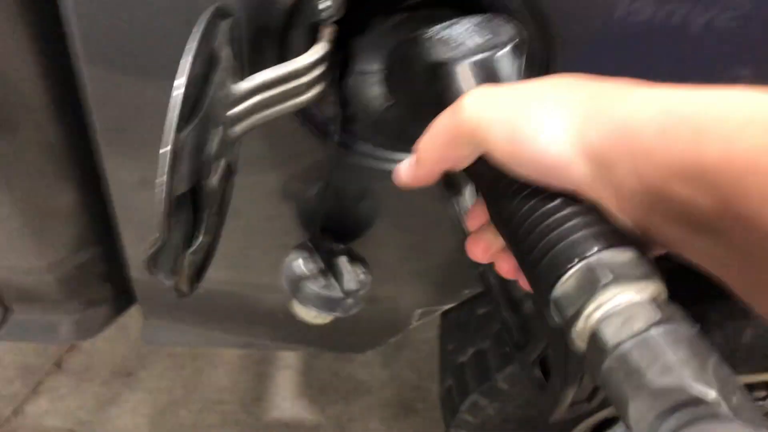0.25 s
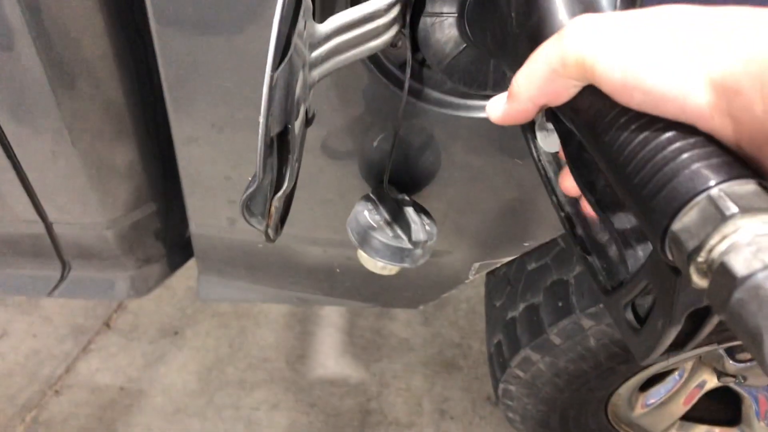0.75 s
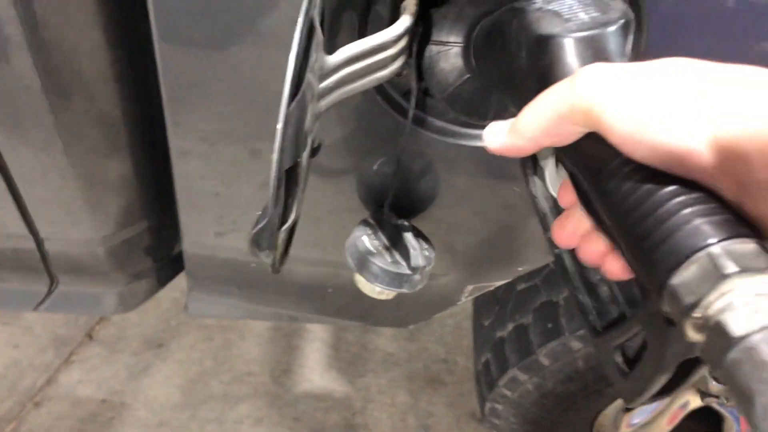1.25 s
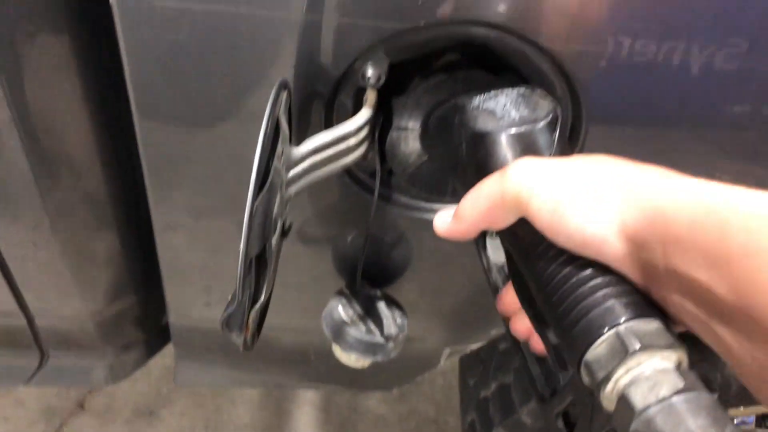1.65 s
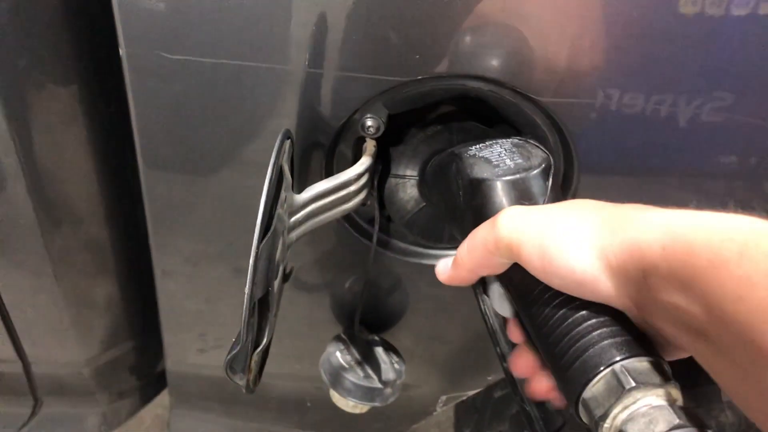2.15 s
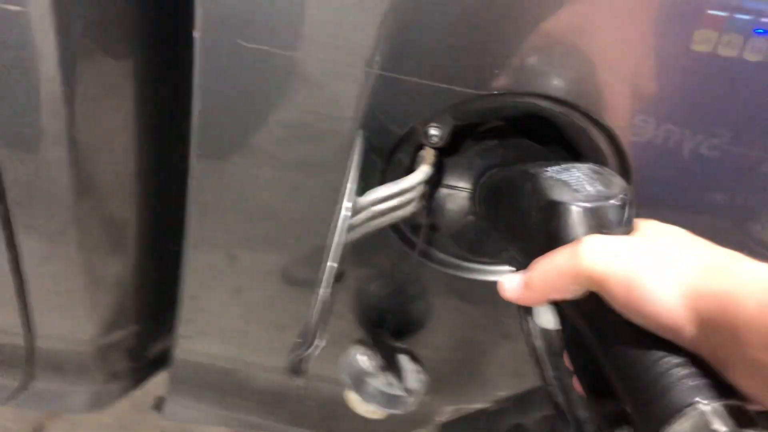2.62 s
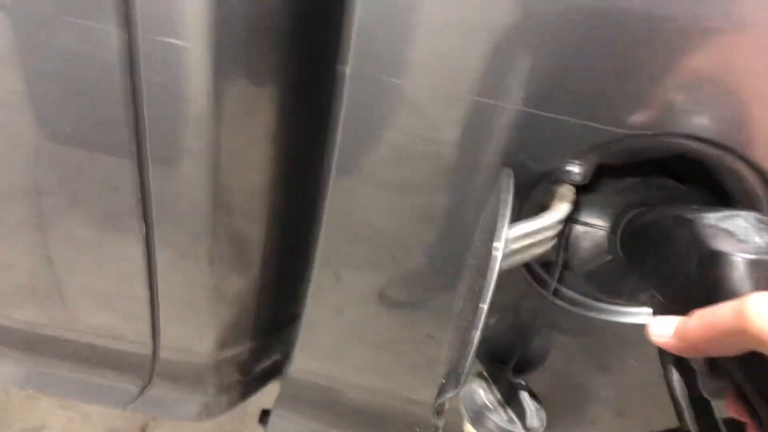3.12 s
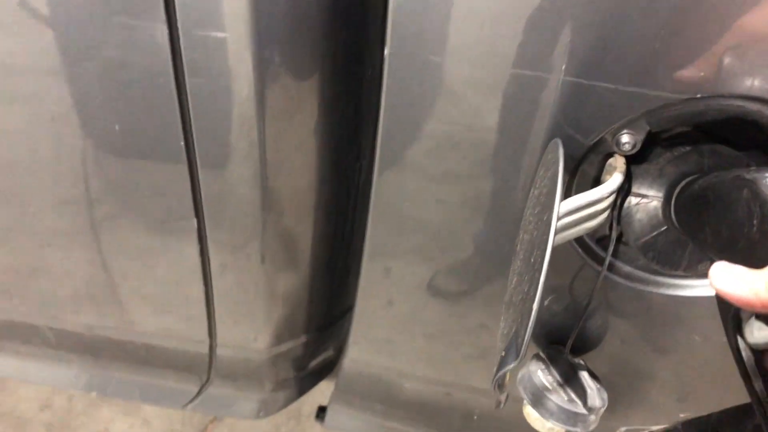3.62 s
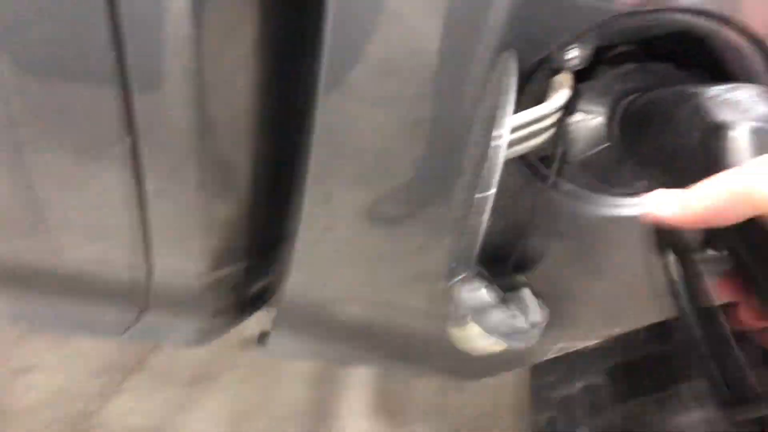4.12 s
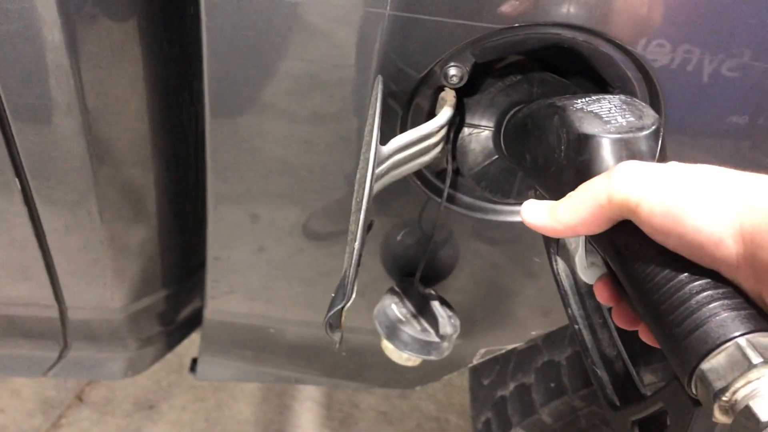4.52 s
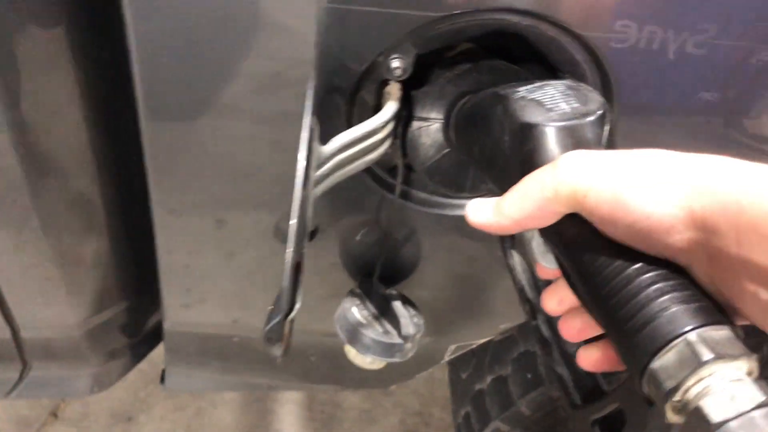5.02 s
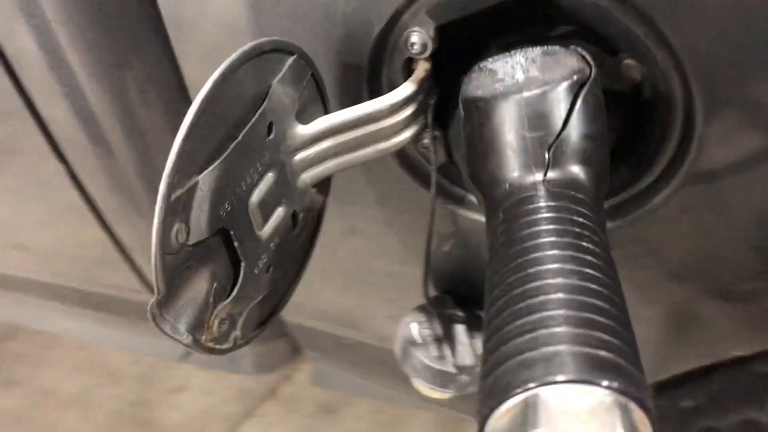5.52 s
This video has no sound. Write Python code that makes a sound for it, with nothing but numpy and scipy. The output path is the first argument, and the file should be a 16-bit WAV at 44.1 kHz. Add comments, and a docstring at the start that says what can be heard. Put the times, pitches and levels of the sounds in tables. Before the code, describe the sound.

From the very start to about 3.95 seconds, a fuel nozzle lever is worked rapidly in a car's filler neck. Each pull is a loud, bright metallic snap, followed almost at once by a knock and small rebound, with loose rattling; thinner clicks mark many releases. Pulls come roughly every 0.22 seconds, quicken to about 0.15 around 2.3 to 3 seconds and grow stronger, then slow again. Low hollow thumps from pipe and panel accompany them, with short scattered echoes from car, pump and canopy. A brief, faint valve groan occurs near 3.3 to 3.45. After the last click, only low, dull forecourt noise remains, with slight finger rustles around 4.1 to 4.5, a clear light metal tap at 4.57 and tiny ticks. From 5.15, low handling thuds bump the close microphone; the rubber grip creaks from 5.3 to 5.63 and releases with a gritty scuff near 5.66, ending at 5.75.

```python
"""Over low forecourt noise, the lever of a fuel nozzle in a car's filler neck snaps and knocks.
Snaps, knocks and thinner release clicks are noise bursts that excite decaying modes of nozzle and car body.
Car, pump and canopy return them as decaying noise, and a limiter ducks everything for a moment after each.
The valve groans briefly as narrow-band noise; then the grip shifts with a tap, a creak and a scuff,
and low handling thuds, bursts of low-pitched noise, sound as the microphone is jostled."""
import sys
import numpy as np
from scipy import signal
from scipy.fft import rfft, irfft
from scipy.io import wavfile
from scipy.ndimage import uniform_filter1d, minimum_filter1d

SR = 44100
rng = np.random.default_rng(int(sys.argv[2]) if len(sys.argv) > 2 else 0)


def to_wav(sig):
    """Store sig (one row per channel, or 1-D mono) as 16-bit WAV at the path in sys.argv[1].

    Samples outside -1..1 are clipped; the rate is SR.
    """
    pcm = np.clip(np.atleast_2d(sig), -1, 1) * 32767
    pcm = np.round(pcm).astype(np.int16)
    wavfile.write(sys.argv[1], SR, pcm.T)  # frames by channels


N = 253619
TIME = np.arange(N) / SR


def amp(db):
    """Level definition: decibels to amplitude ratio."""
    return 10 ** (np.asarray(db) / 20)


def unit(x):
    """Energy normalization: the squares sum to one."""
    return x / np.sqrt(np.sum(x ** 2) + 1e-20)


def read(points, hz):
    """Logarithmic pitch scale: joins (f/Hz, value) points by straight lines over log frequency."""
    f, value = np.transpose(points)
    return np.interp(np.log(hz + 1), np.log(f + 1), value)


def add(mix, s, sound):
    """Superposition: adds a sound to the mix, starting at s seconds."""
    at = round(s * SR)
    sound = sound[max(-at, 0):]
    part = mix[max(at, 0):][:len(sound)]
    part += sound[:len(part)]


def noise(spectrum, size):
    """Spectral shaping: white noise filtered to a given spectrum, with an rms of one."""
    z = rfft(rng.standard_normal(size))
    z = z * amp(read(spectrum, np.fft.rfftfreq(size, 1 / SR)))
    return unit(irfft(z, size)) * np.sqrt(size)


def causal(x, db):
    """Minimum phase: colours x by a gain per bin without smearing its attack backwards."""
    log_gain = np.log(amp(np.r_[db, db[-2:0:-1]]))
    response = np.exp(np.conj(signal.hilbert(log_gain)))[:len(db)]
    return irfft(rfft(x) * response)


def ringing(modes, t):
    """Modal superposition: a sum of exponentially dying sines of random phase."""
    return sum(amp(db - 60 * t / t60) * np.sin(2 * np.pi * (hz * t + rng.random()))
               for hz, db, t60 in modes)


def steady(spectrum, level, waver_db):
    """Amplitude modulation: noise follows a level curve and wavers slowly."""
    waver = sum(np.sin(2 * np.pi * (f * TIME + rng.random())) for f in np.geomspace(1, 14, 18)) / 3
    level_db = np.interp(TIME, *np.transpose(level)[:2], left=-100)
    return noise(spectrum, N) * amp(level_db + waver_db * waver)


def swells(rows, width_s, lead_s=0):
    """Gaussian envelope: a bell-shaped rise and fall for each (t/s, level/dB) row."""
    return sum(amp(db) * np.exp(-((TIME - s + lead_s) / width_s) ** 2) for s, db, *_ in rows)


def contacts(rows, colour, gain_db, t60, chatter, low_db, high_db, widening, scatter_db, size=2048):
    """Impact excitation: a hard edge and brief metal chatter; stronger impacts can spread wider in pitch."""
    t, hz, out = np.arange(size) / SR, np.fft.rfftfreq(size, 1 / SR), np.zeros(N)
    low = read([(3300, 1), (6500, 0)], hz)
    high = read([(8000, 0), (10000, 1)], hz)
    usual_db = np.median([row[1] for row in rows])
    # the edge dies over t60, the weaker chatter half as fast
    envelope = amp(-60 * t / t60) + chatter * amp(-30 * t / t60)
    for s, db, *_ in rows:
        wider_db = widening * (db - usual_db) + scatter_db * rng.standard_normal()
        tone = read(colour, hz) + low * (low_db + wider_db) + high * (high_db + wider_db)
        click = unit(causal(rng.standard_normal(size) * envelope, tone))
        add(out, s, click * amp(db + gain_db))
    return out


# The lever is pulled; levels are relative, before the gain of each layer:
# [snap t/s, snap level/dB, knock delay/s, knock level/dB, rebound level/dB, thump level/dB]
PULLS = [(-.026, -3, .025, -17, -24, -39), (0.2554, -7.5, 0.013, -7.5, -30, -40),
         (0.4942, -4.5, 0.014, -7.5, -15, -38), (0.7066, -2, .012, -14, -21, -39.5),
         (.9144, -4, 0.022, -7, -39, -38), (1.1425, -5.5, 0.016, -10, -28, -40.5),
         (1.3624, -5, 0.02, -4.5, -18, -36), (1.5836, -2, 0.02, -4.5, -7.5, -36),
         (1.784, -3, 0.017, -7, -35, -38.5), (1.9624, -2, .0261, -4, -22, -38),
         (2.1451, 0, 0.022, -2, -28, -37), (2.2835, -1.5, .0242, -2.5, -5, -34.5),
         (2.4432, -1, 0.014, -25, -35.5, -37), (2.5574, -1.5, 0.021, -2.5, -20, -37.5),
         (2.7034, -0.5, .0239, -7, -28, -36), (2.8458, 0, 0.026, -4.5, -29.5, -34.5),
         (2.992, 0, 0.025, -2, -7, -33), (3.173, 0, 0.02, -1, -7, -30), (3.36, 1, 0.02, -1.5, -19, -35.5),
         (3.582, -1.5, 0.02, -1, -12, -32.5), (3.8331, -4, 0.032, -11, -38, -39.5)]
# the rebound follows the knock by a fixed time plus a share of the knock's own delay
REBOUND_S, REBOUND_SHARE = .008, .35


def knocks():
    """Repeated impact: after each snap the valve hits its stop, then rebounds onto it."""
    first = [(s + delay, db) for s, _, delay, db, _, _ in PULLS]
    rebounds = [(s + delay + REBOUND_S + REBOUND_SHARE * delay, db)
                for s, _, delay, _, db, _ in PULLS]
    return first + rebounds


def rattle(rows, below_db, delay_s, spread_s, fade_db, count=9):
    """Dissipative bouncing: loose parts knock at random times after each snap, later ones tending weaker."""
    draws = rng.random((len(rows), count, 2))
    return [(s + delay_s + spread_s * late, db + below_db - fade_db * late - 6 * weak)
            for (s, db, *_), bounces in zip(rows, draws) for late, weak in bounces]


# The lever springs back: [t/s, relative level/dB]
RELEASES = [(0.0899, -8.5), (0.3567, -8), (0.5936, -8.5), (.7924, -7.5), (1.001, -9.5), (1.2338, -8),
            (1.4512, -6), (1.6653, -7.5), (1.8535, -8.5), (2.0447, -7.5), (2.3632, -7.5), (2.7864, -4.5),
            (3.0745, -7.5), (3.242, -10.5), (3.4809, -6.5), (3.6793, -5.5), (3.9152, -19), (3.9474, -6.5)]
# Loose parts of the handle tick: [t/s, relative level/dB]
TICKS = [(1.11, -29.5), (1.191, -28.5), (1.9029, -26), (1.9577, -25.5), (2.1055, -31), (2.1235, -18),
         (2.2494, -27.5), (2.2676, -27), (3.0571, -20), (3.1665, -30), (3.272, -28.5), (3.4451, -12),
         (3.6352, -8), (3.6541, -16.5), (3.8957, -27), (3.9329, -35), (4.5677, -34), (4.6188, -46.5),
         (4.787, -51.5), (5.056, -50), (5.106, -49.5)]
# Spectrum of the latch's snap: [f/Hz, level/dB]
PULL_COLOUR = [(200, -22), (1000, -16), (1800, -13), (2500, -9.5), (3300, -3), (4050, -1.5), (4700, -12.5),
               (6000, -7), (6900, 5), (7800, -6), (9200, -11), (10800, -1.5), (13000, -9.5), (15200, -5.5)]
# Spectrum of the valve's knock and of the rattle: [f/Hz, level/dB]
KNOCK_COLOUR = [(200, -11), (1000, -11.5), (1800, -12), (2300, -6), (3100, -3), (4050, -0.5), (4800, -6.5),
                (5900, -5.5), (6800, 2), (8000, -8.5), (9300, -10.5), (10900, -4), (12900, -9.5),
                (15300, -7)]
# Spectrum of the release click: [f/Hz, level/dB]
RELEASE_COLOUR = [(200, -10), (1000, -17.5), (2600, -14), (3400, -3.5), (4300, 1.5), (5500, -1.5),
                  (6600, -5.5), (7600, 2), (9000, 3), (9900, -1), (10600, 3.5), (12500, -0.5), (13700, 4.5),
                  (15500, 0)]
# Spectrum of the loose ticks: [f/Hz, level/dB]
TICK_COLOUR = [(200, -17), (1500, -5.5), (2800, -2), (3700, 6), (5000, 4), (7200, -2.5), (10500, -2),
               (15500, -13)]


def lever():
    """Superposed impacts: the handle's snaps, knocks, releases, ticks and rattle."""
    bounces = rattle(PULLS, below_db=-17.0, delay_s=.006, spread_s=0.045, fade_db=15.5)
    out = contacts(PULLS, PULL_COLOUR, gain_db=16.5, t60=0.024, chatter=0.14,
                   low_db=-0.5, high_db=1.7, widening=0.51, scatter_db=.8)
    out += contacts(knocks(), KNOCK_COLOUR, gain_db=16.5, t60=0.019, chatter=.08,
                    low_db=2.0, high_db=3, widening=.05, scatter_db=1.0)
    out += contacts(RELEASES, RELEASE_COLOUR, gain_db=18.5, t60=0.016, chatter=0.33,
                    low_db=4.5, high_db=2.5, widening=.1, scatter_db=1.0)
    out += contacts(TICKS, TICK_COLOUR, gain_db=17.5, t60=0.017, chatter=0.11,
                    low_db=-0.3, high_db=3.1, widening=0.043, scatter_db=0.5)
    out += contacts(bounces, KNOCK_COLOUR, gain_db=12, t60=0.019, chatter=0.056,
                    low_db=7.5, high_db=-6, widening=.05, scatter_db=1.0)
    return out


# Modes of the metal nozzle, before slight detuning: [f/Hz, relative level/dB, t60/s]
NOZZLE = [(2246, 14.5, 0.11), (2930, -6.5, 0.139), (3110, -5, 0.088), (3300, 23, 0.075), (3340, 6.5, 0.059),
          (3860, -28, 0.21), (4050, 9, 0.2), (4120, 9.5, 0.2), (4420, 6, 0.08), (5060, -8.5, 0.15),
          (5650, -8, .1), (6300, -3.5, 0.064), (7030, -5.5, 0.045), (7110, -16, 0.063),
          (10500, -1.5, 0.088), (10800, -5.5, 0.061), (13800, -4.5, 0.074)]


def nozzle(clicks, ring_db, detune, count=3):
    """Modal resonance: contacts ring the casting; the hand's changing grip shifts its modes a little."""
    t, out = np.arange(SR // 3) / SR, clicks
    for k in range(count):
        modes = [(hz * (1 + detune * rng.standard_normal()), db, t60) for hz, db, t60 in NOZZLE]
        ring = unit(ringing(modes, t))
        # clicks pass gradually from one detuned set of modes to another
        share = np.sqrt(2 / count) * np.cos(np.pi * (TIME + k / count))
        out = out + amp(ring_db) * signal.oaconvolve(clicks * share, ring)[:N]
    return out


# Friction noise of the lever's pivot and spring: [f/Hz, relative density/dB per Hz]
SCRAPE = [(300, -9.5), (1500, -26), (3300, -2), (5200, 3), (6500, 1.5), (8500, -1), (12000, -1),
          (15500, -1.5)]


def scrape(rows, gain_db, lead_s, grain_db):
    """Sliding friction: grainy noise swells just before each given moment."""
    grains = uniform_filter1d(rng.standard_normal(N), size=64) * np.sqrt(64)
    envelope = swells(rows, lead_s, lead_s / 2)
    return noise(SCRAPE, N) * envelope * amp(gain_db + grain_db * grains)


# Modes of the filler pipe and body panel: [f/Hz, relative level/dB, t60/s]
BODY = [(133.4, -11.5, 0.32), (175.4, -9, 0.33), (205.9, 2.5, 0.17), (224.4, 0, 0.22), (279.1, -2, 0.24),
        (299.6, -6.5, 0.33), (347.2, -13, 0.43), (401.9, -8, 0.26), (470, -7, 0.12), (594, -11.5, 0.17),
        (625, -7.5, 0.12), (713, -2.5, 0.13)]
# Hollow rumble of the filler recess: [f/Hz, relative level/dB]
HOLLOW = [(20, -42.5), (35, -30), (60, -1.5), (100, -19.5), (160, 0), (230, 1), (330, 2), (500, -7),
          (700, -6), (900, -17.5), (1600, -23), (3000, -30.5), (8000, -63)]


def thumps(times, gain_db, swell_s, hollow_db, hollow_t60, hardness, follow=1):
    """Structure-borne excitation: jolts swell in pipe and panel, following the force of the nearest pulls."""
    t, out = np.arange(SR // 2) / SR, np.zeros(N)
    swell = 1 - np.exp(-(t / swell_s) ** 2)
    deep = swell * ringing([mode for mode in BODY if mode[0] < 250], t)
    upper = swell * ringing([mode for mode in BODY if mode[0] >= 250], t)
    pull_s, *_, thump_db = np.transpose(PULLS)
    for s in times:
        harder_db = follow * (np.interp(s, pull_s, thump_db) - thump_db.mean())
        # a harder jolt wakes more of the upper modes
        boom = unit(deep + amp(hardness * harder_db) * upper)
        hollow = unit(swell * noise(HOLLOW, len(t)) * amp(-60 * t / hollow_t60))
        level = amp(thump_db.mean() + harder_db + gain_db)
        add(out, s, level * (boom + amp(hollow_db) * hollow))
    return out


# Forecourt background spectrum: [f/Hz, relative density/dB per Hz]
FORECOURT = [(20, -37.5), (45, -3.5), (70, -5), (110, 1), (165, 4), (240, -5), (600, -9), (1050, -8.5),
             (1900, -13.5), (2800, -23), (5000, -32.5), (8000, -37.5), (12000, -41), (16000, -36)]
# Forecourt background level, before its waver: [t/s, level/dB]
FORECOURT_DB = [(0, -52), (3.9, -48.5), (4.299, -50.5), (5.2, -48), (5.75, -46)]


def forecourt():
    """Broadband ambience: shaped noise at a slowly changing level."""
    return steady(FORECOURT, FORECOURT_DB, waver_db=0.6)


def echoes(x, bands, delay_s, rise_s, count=3):
    """Diffuse reflection: scattered echoes arrive after a delay and die band by band."""
    bands, out = np.array(bands), np.zeros(N)
    for k in range(count):
        hz, t, z = signal.stft(rng.standard_normal(SR), SR, nperseg=256)
        db, t60 = read(bands[:, :2], hz)[:, None], read(bands[:, ::2], hz)[:, None]
        # the root keeps a band's energy independent of its decay time
        z = z * amp(db - 60 * t / t60) * np.sqrt(2 * np.log(1000) / (t60 * SR))
        tail = signal.istft(z, SR, nperseg=256)[1]
        tail = tail * (1 - np.exp(-np.arange(len(tail)) / SR / rise_s))
        # the pattern of reflections drifts as the microphone moves
        share = np.sqrt(2 / count) * np.cos(np.pi * (TIME + k / count))
        add(out, delay_s, signal.fftconvolve(x * share, tail))
    return out


# Echoes from car and pump: [f/Hz, level/dB, t60/s]
NEAR = [(200, -8, 0.61), (1090, -2.5, 0.13), (2016, -4, 0.069), (3840, -12, 0.087), (7000, -14.5, 0.093),
        (11000, -17, 0.13), (16000, -20, 0.14)]
# Echoes from the canopy: [f/Hz, level/dB, t60/s]
CANOPY = [(199, -5, 0.61), (1105, -27, 0.63), (3900, -27.5, 0.88), (6970, -29, 0.66), (11050, -34.5, 0.48),
          (16000, -31.5, 0.35)]


def surroundings(metal):
    """Path delay: car and pump answer first, the farther canopy later."""
    near = echoes(metal, NEAR, delay_s=.008, rise_s=0.013)
    return near + echoes(metal, CANOPY, delay_s=.025, rise_s=0.04)


# Fingers rustle on the handle: [t/s, relative level/dB]
RUSTLES = [(.04, -57), (4.1, -54), (4.36, -58), (4.41, -52), (4.5, -63), (5.1, -56)]


def rustling():
    """Sliding friction: brief grainy swells from the fingers."""
    return scrape(RUSTLES, gain_db=-4, lead_s=0.015, grain_db=3.0)


# Spectrum of the valve's groan: [f/Hz, relative density/dB per Hz]
GROAN = [(500, -37.5), (820, -12), (950, 4.5), (1100, -9), (1300, -18), (1700, -14), (2050, -8),
         (2400, -30), (5000, -47.5)]
# The valve groans briefly: [t/s, level/dB]
GROANS = [(3.308, -40), (3.455, -46)]


def groaning():
    """Narrow-band noise: the valve's groan rises and falls in a bell-shaped envelope."""
    return noise(GROAN, N) * swells(GROANS, width_s=0.022)


# A tap on the lever guard: (t/s, level/dB)
TAP = (4.568, -9)
# Modes of the metal lever guard: [f/Hz, relative level/dB, t60/s]
GUARD = [(1500, -9, .012), (1970, -4, .015), (2780, -6, .01), (3470, -12, .02), (3620, 5, .026),
         (4080, 6.5, .012)]


def tap():
    """Modal resonance: the tapped lever guard rings briefly."""
    out = np.zeros(N)
    ring = unit(ringing(GUARD, np.arange(SR // 8) / SR))
    add(out, TAP[0], amp(TAP[1]) * ring)
    return out


# Spectrum of the handling thuds: [f/Hz, relative density/dB per Hz]
THUD_COLOUR = [(15, -39), (28, -15), (45, -1), (75, 7), (115, -18), (180, -40), (500, -40), (2000, -93)]
# The microphone is jostled: [t/s, relative level/dB]
THUDS = [(5.159, -37.5), (5.355, -35), (5.423, -41), (5.501, -39), (5.625, -39.5)]
THUD_RISE_S, THUD_FALL_DB_PER_S = 0.0072, 240


def handling_thuds(gain_db):
    """Damped low-frequency burst: each thud rises quickly and dies away as a low rumble."""
    t, out = np.arange(SR // 3) / SR, np.zeros(N)
    envelope = (1 - np.exp(-t / THUD_RISE_S)) * amp(-THUD_FALL_DB_PER_S * t)
    for s, db in THUDS:
        add(out, s, amp(db + gain_db) * unit(noise(THUD_COLOUR, len(t)) * envelope))
    return out


# Spectrum of rubbing, creak and scuff on the rubber grip: [f/Hz, relative density/dB per Hz]
RUBBER = [(200, -14.5), (900, 3), (1600, 4.5), (2600, -4), (3500, -6.5), (5500, -15), (8500, -17),
          (10500, -23), (13800, -15), (16000, -22.5)]
# Level of the hand rubbing on the grip, before its waver: [t/s, level/dB]
RUB_DB = [(5.2, -84), (5.33, -65), (5.62, -59), (5.75, -57)]


def rubbing():
    """Sliding friction: wavering noise of the hand on rubber."""
    return steady(RUBBER, RUB_DB, waver_db=5.0)


# The grip sticks and slips: [t/s, slip rate f/Hz]
CREAK = [(5.294, 25), (5.41, 87), (5.53, 91), (5.635, 61)]


def creak(gain_db, t60, size=1024):
    """Stick-slip friction: every slip gives a small rubbery click."""
    s, rate = np.transpose(CREAK)
    t, out = np.arange(s[0], s[-1], 1 / SR), np.zeros(N)
    cycles = np.cumsum(np.interp(t, s, rate)) / SR
    # one slip at each whole cycle
    slips = t[np.diff(np.floor(cycles), prepend=-1) > 0]
    envelope = amp(-60 * np.arange(size) / SR / t60)
    tone = read(RUBBER, np.fft.rfftfreq(size, 1 / SR))
    for at in slips:
        click = unit(causal(rng.standard_normal(size) * envelope, tone))
        add(out, at, click * amp(gain_db))
    return out


# The grip lets go in a gritty scuff: (t/s, level/dB before grain)
SLIP = (5.658, -42)


def scuff(rise_s, fall_db_per_s, grain_db):
    """Friction release: the hand breaks loose from the rubber in a gritty burst that dies away."""
    since = TIME - SLIP[0]
    grains = uniform_filter1d(rng.standard_normal(N), size=49) * np.sqrt(49)
    level_db = SLIP[1] - fall_db_per_s * np.maximum(since, 0) + grain_db * grains
    rise = np.exp(-(np.minimum(since, 0) / rise_s) ** 2)
    return noise(RUBBER, N) * amp(level_db) * rise


def scene():
    """Linear superposition: lever, thumps, echoes, shifting grip, handling thuds and forecourt."""
    pull_s, release_s = [row[0] for row in PULLS], [row[0] for row in RELEASES]
    metal = nozzle(lever(), ring_db=-22.5, detune=.005) + tap()
    friction = scrape(PULLS, gain_db=-53, lead_s=0.031, grain_db=7)
    friction += scrape(RELEASES, gain_db=-47, lead_s=.018, grain_db=6.5)
    body = thumps(pull_s, gain_db=33.5, swell_s=0.037, hollow_db=-7, hollow_t60=0.31, hardness=.75)
    body += thumps(release_s, gain_db=25.0, swell_s=0.025, hollow_db=1, hollow_t60=0.31,
                   hardness=0.44, follow=.6)
    grip = rustling() + rubbing() + creak(gain_db=-21, t60=.012)
    grip += scuff(rise_s=0.019, fall_db_per_s=170, grain_db=2.5)
    background = forecourt() + handling_thuds(gain_db=30)
    return (metal + friction + body + surroundings(metal) + grip + groaning() + background)[None]


def limiter(x, threshold_db, depth_db, hold_s, recovery_db_per_s):
    """Dynamic gain reduction: clamps at once on a loud click, holds briefly, and lets go fast."""
    power_db = 10 * np.log10(abs(uniform_filter1d(x ** 2, size=44)) + 1e-12)
    over_db = np.clip(power_db - threshold_db, 0, depth_db)
    hold = max(int(hold_s * SR), 64)
    # the largest excess is held, with some 20 samples of look-ahead
    held = -minimum_filter1d(-over_db, hold, origin=(hold - 1) // 2 - 20)
    fall = TIME * recovery_db_per_s
    reduction_db = np.maximum.accumulate(held + fall) - fall
    return x / amp(uniform_filter1d(reduction_db, size=24))


EDGE_HZ = 15900


def record(dry):
    """Band limitation: the microphone's bass cut, the limiter, then a steep treble cut."""
    bass_cut = signal.butter(4, 36, "highpass", fs=SR, output="sos")
    heard = signal.sosfilt(bass_cut, dry[0])
    limited = limiter(heard, threshold_db=-24, depth_db=10, hold_s=0.005, recovery_db_per_s=1404.0)
    treble_cut = signal.firwin(511, EDGE_HZ, window=("kaiser", 9), fs=SR)
    return signal.oaconvolve(limited, treble_cut, "same")[None]


dry = scene()
out = record(dry)
to_wav(out)
```